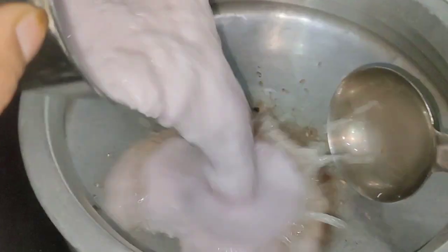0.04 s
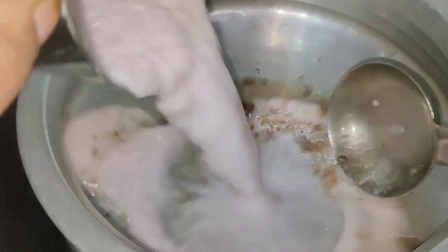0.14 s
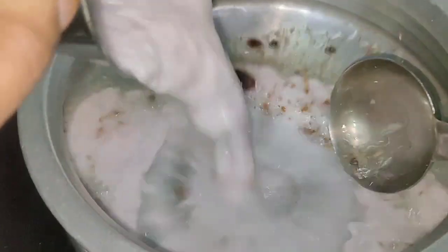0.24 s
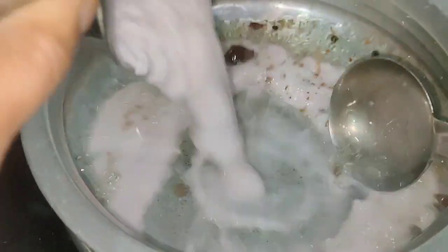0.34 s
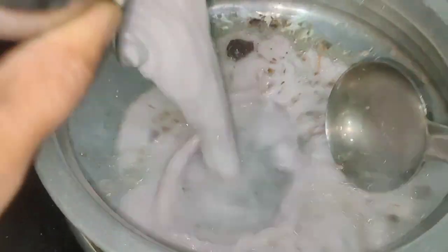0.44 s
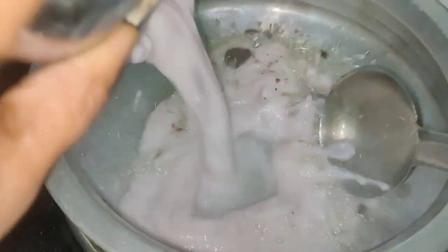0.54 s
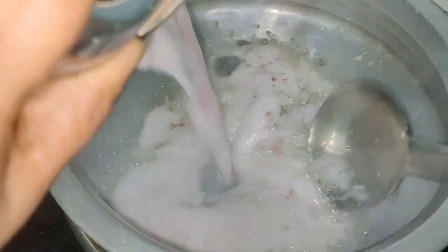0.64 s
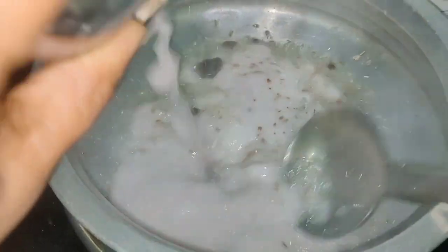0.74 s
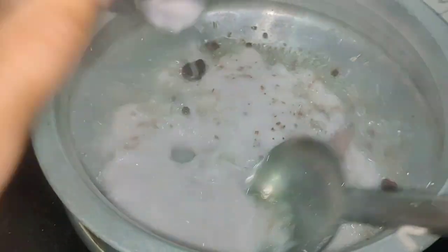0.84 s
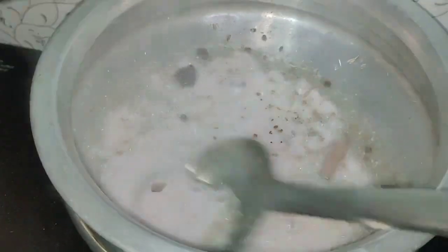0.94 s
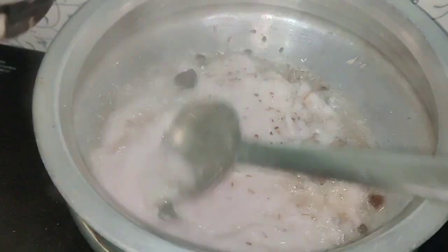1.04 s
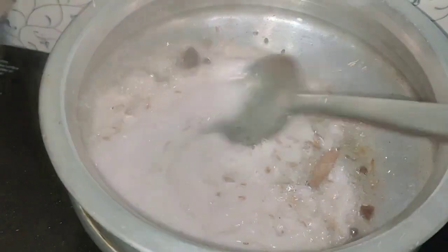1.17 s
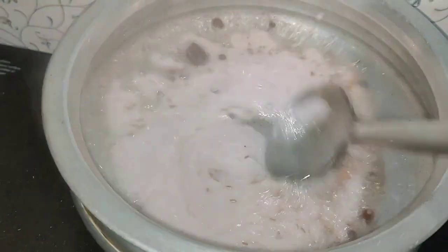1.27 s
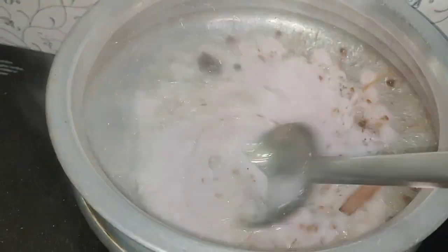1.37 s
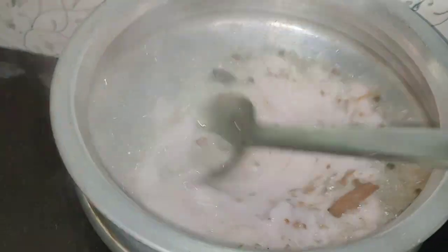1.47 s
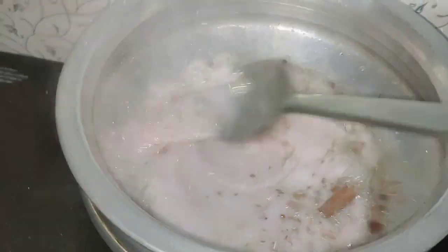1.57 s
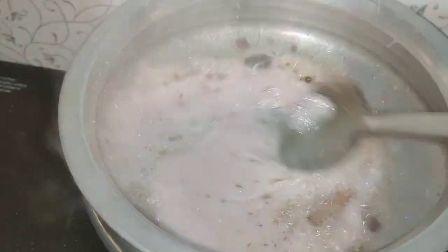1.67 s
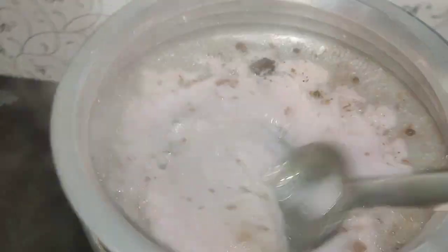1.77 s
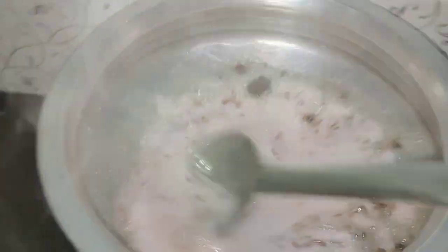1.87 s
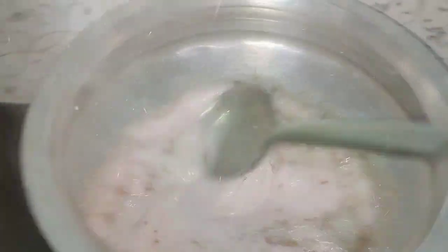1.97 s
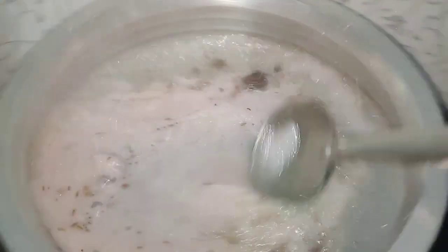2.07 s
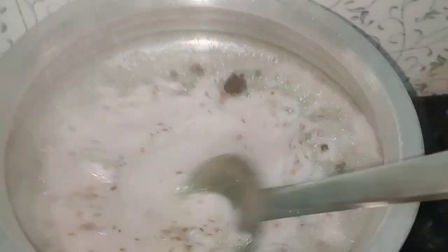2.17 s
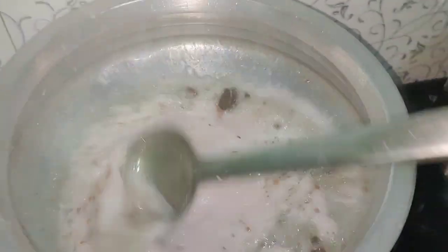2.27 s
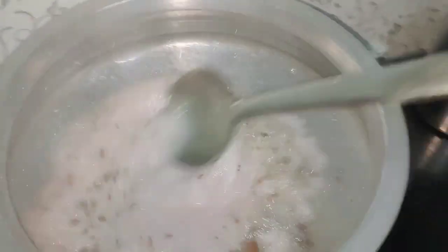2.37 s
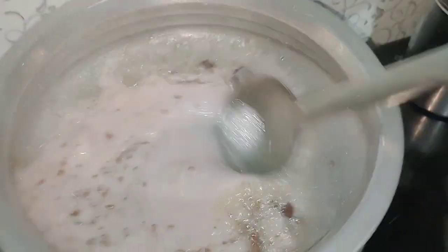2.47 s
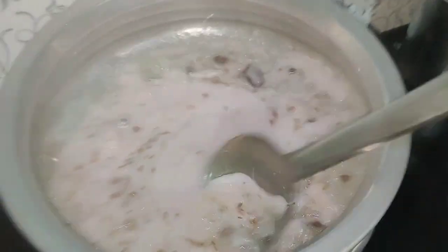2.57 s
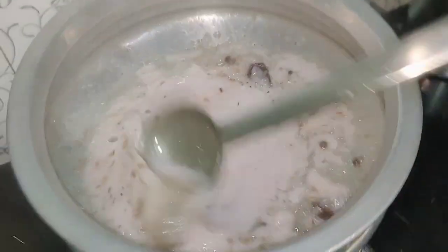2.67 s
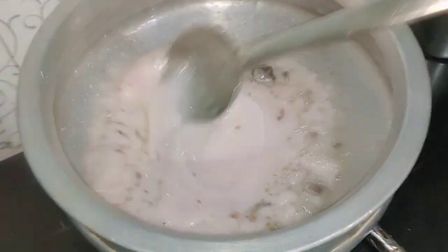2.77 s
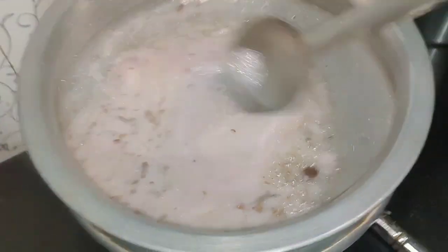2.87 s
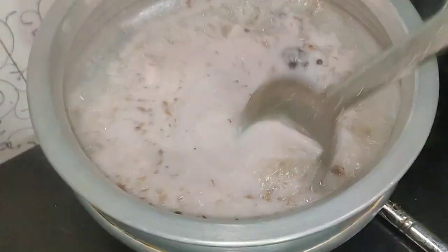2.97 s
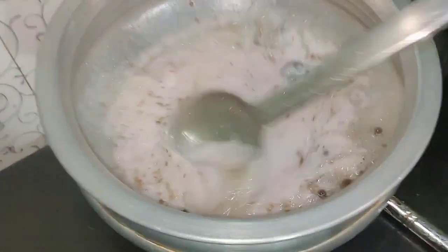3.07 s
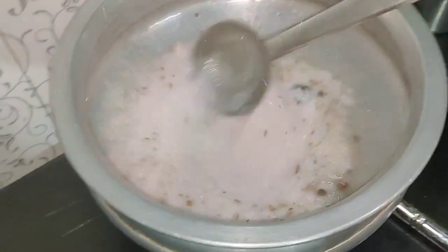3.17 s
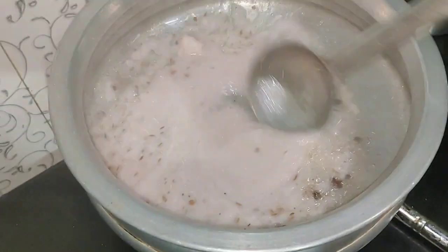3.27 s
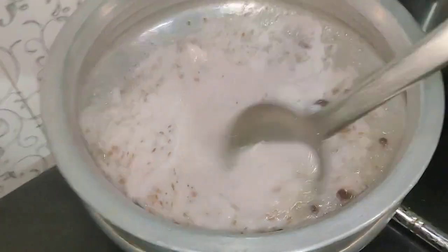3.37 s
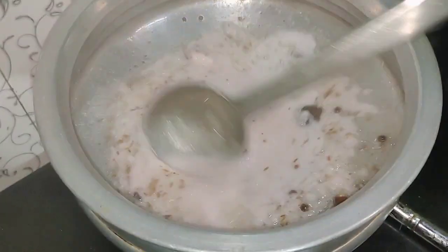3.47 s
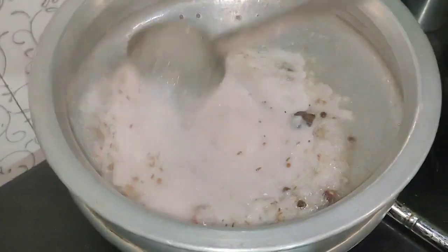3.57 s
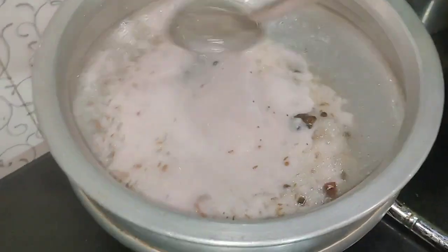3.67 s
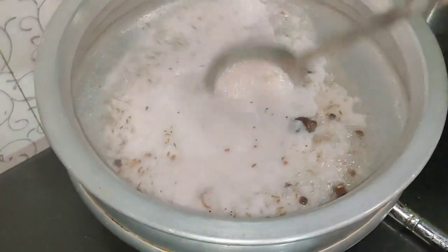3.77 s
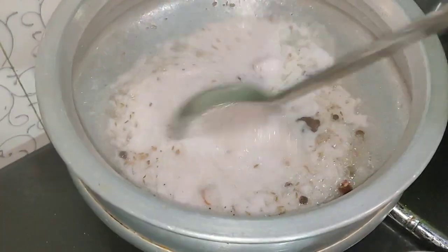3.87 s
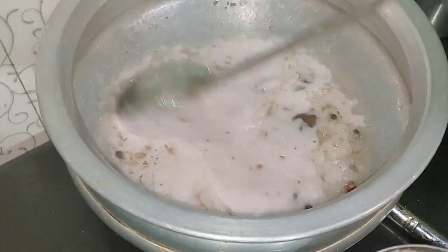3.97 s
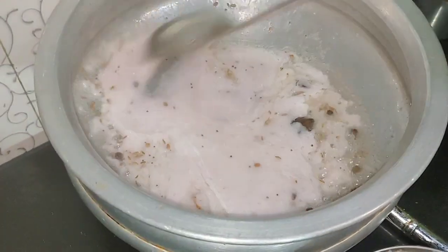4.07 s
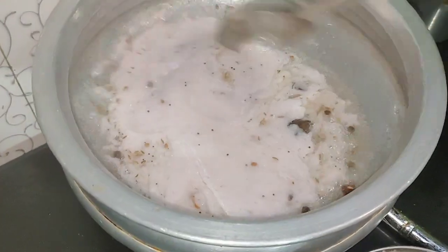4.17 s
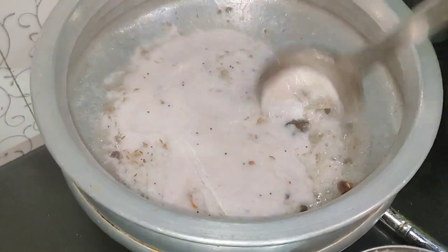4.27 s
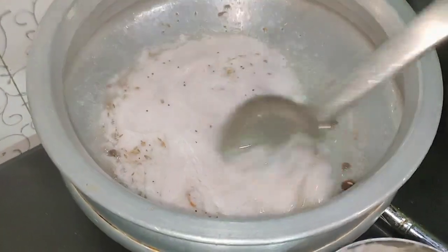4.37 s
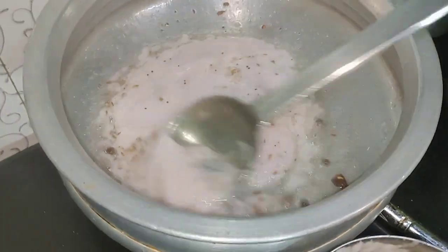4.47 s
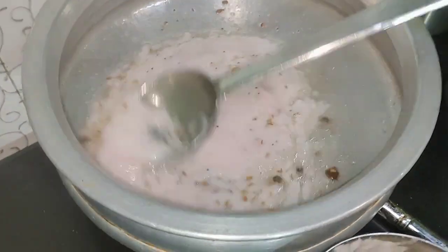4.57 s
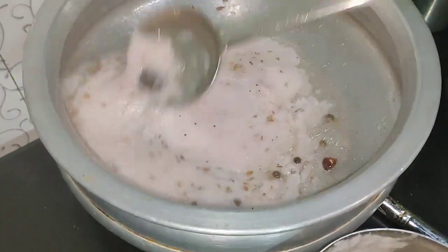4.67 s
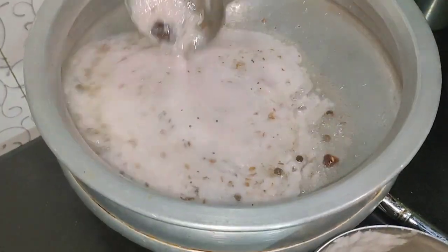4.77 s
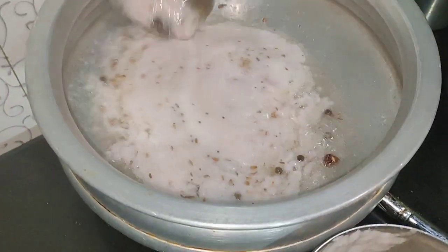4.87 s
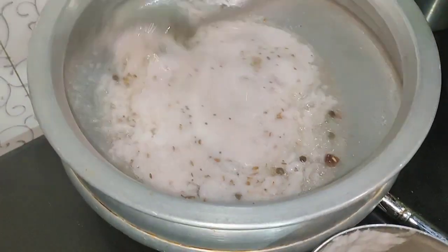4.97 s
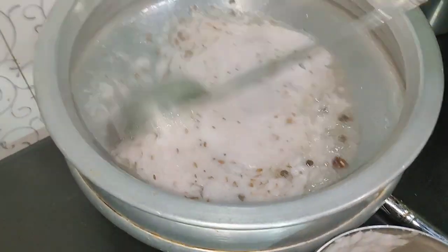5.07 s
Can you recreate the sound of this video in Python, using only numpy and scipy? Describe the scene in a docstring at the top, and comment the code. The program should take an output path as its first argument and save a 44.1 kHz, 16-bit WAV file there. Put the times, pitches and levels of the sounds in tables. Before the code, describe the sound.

Heard up close at a kitchen stove, wet onion paste lands in hot oil with a low plop just after a light metallic tick. A dense, fizzing crackle rises at once, dotted with sharp spits and small wet smacks of steam. The sizzle surges with each ladle stroke, then gradually quietens as the ladle knocks softly in the metal pot. A low gas burner rumble runs underneath throughout.

```python
"""A gas flame rumbles under a wide metal pot of faintly sizzling oil. Metal ticks once on the pot.
Wet onion paste slides in with a plop and a gurgle, and its water flashes to steam: thousands of tiny
bubbles burst and ring in the pot. Drops spit, steam smacks through the paste, and the sizzle swells and
dips with the strokes of a ladle. Late on, the ladle bumps dully and the sizzle fades as the oil cools."""
import sys
import numpy as np
from scipy import signal
from scipy.fft import rfft, irfft, next_fast_len
from scipy.io import wavfile

SR = 44100
rng = np.random.default_rng(int(sys.argv[2]) if len(sys.argv) > 2 else 0)


def put_to_file(sound):
    """Save the sound as 16-bit audio at rate SR, in the file named by the first command-line argument."""
    columns = np.atleast_2d(sound).T  # one column per channel
    safe = np.clip(columns, -1, 1)
    whole_steps = np.round(safe * 32767)
    wavfile.write(sys.argv[1], SR, whole_steps.astype(np.int16))


N = 225995
TIME = np.arange(N) / SR

# how hard the paste fries as it touches, lands, is spread, then cools the oil: (time [s], level [dB])
FRYING_CURVE = [(0.28, -36.5), (0.317, -32), (0.325, -27.5), (0.395, -23.5), (0.425, -19.8), (0.53, -19),
                (0.58, -18.5), (0.685, -18.5), (0.76, -21), (1.46, -20), (1.54, -17.5), (2.2, -19),
                (3.45, -22.5), (4.65, -28), (4.8, -29.5), (5.12, -29)]
FULL_DB = -20  # the point on that curve that counts as full frying
# pitch range and EQ of the small, medium and large bubbles: (frequency [Hz], gain [dB])
FIZZ_EQ = [(2500, -27.5), (4000, -15.5), (4800, -10.5), (5500, -3.5), (6100, -0.5), (7000, 0), (7450, -1.5),
           (8000, -5.5)]
CRACKLE_EQ = [(900, -14.5), (1500, -11.5), (2000, -11), (2400, -9), (3000, -4.5), (3800, -2), (4600, -1.5),
              (6000, -3.5)]
BUBBLING_EQ = [(200, -10.5), (400, -5), (570, -4), (700, 2), (850, -10.5), (1100, 1), (1300, -3),
               (1600, -4), (2300, 0)]
# how each size follows the frying: (at full frying [dB], slope [dB/dB], oil alone [dB], flutter [dB])
FIZZ_DYNAMICS = (-20.5, 1.0, -51.5, 0.68)
CRACKLE_DYNAMICS = (-32.5, 1.13, -55, 0.63)
BUBBLING_DYNAMICS = (-43.5, 1.25, -57.5, -1.2)
# ladle strokes turn wet paste onto hot metal or smother it:
# (middle [s], length [s], crackle lift [dB], bubbling lift [dB])
LADLE_STROKES = [(1.308, 0.19, 3, 1), (1.6, 0.15, -0.5, -2), (2.032, 0.32, 1, 0), (2.477, 0.32, 2.9, 0),
                 (2.87, 0.088, 2.6, 1.5), (3.0, 0.098, -0.5, -2), (4.12, 0.26, -1.1, -1.5),
                 (4.34, 0.12, 4.5, -1), (4.51, 0.13, 1, 4), (4.63, 0.19, 4.2, 1)]
# air resonances of the open pot: (frequency [Hz], width [Hz], lift [dB])
POT_MODES = [(561, 11, 10), (651, 26, 6.5), (675, 30, 5.5), (1118, 120, 6), (1283, 120, 5),
             (1677, 120, 4.5), (2310, 79, 5), (2720, 120, 4), (3840, 340, 2)]
# spits of hot oil: (time [s], level [dB], decay [s], pan left [dB])
OIL_SPITS = [(0.2797, -34.5, 0.0081, -7), (0.562, -20.5, 0.018, -5.5), (0.978, -11.5, 0.0031, 0),
             (1.0338, -11, 0.0036, -2), (1.0431, -12, 0.006, 11.5), (2.1183, -7.5, 0.001, -4),
             (2.96, -13.5, 0.00077, -9.5)]
# steam breaking through the paste: (time [s], level [dB], centre [Hz], width [octaves])
STEAM_SMACKS = [(0.3198, -24, 3830, 0.53), (0.711, -20, 3500, 0.39), (1.2019, -21.5, 2010, 0.25),
                (1.633, -22, 3740, 0.18), (1.6695, -25.5, 2280, 0.14), (2.744, -28, 2820, 0.3),
                (2.8447, -27.5, 2930, 0.22)]
# one dry tick of metal on the pot: (centre [Hz], level [dB], width [octaves], decay [s], pan left [dB])
TICK_BANDS = [(1770, -31.5, 0.21, 0.01, 0.5), (2615, -31.5, 0.16, 0.012, 5), (3500, -35, 0.15, 0.012, 5.5),
              (5630, -24.5, 0.27, 0.0089, -0.5)]
# the paste meets the bottom of the pot: (time [s], level [dB], centre [Hz])
PASTE_PLOPS = [(0.398, -30, 118)]
# gurgle of the falling paste: (frequency [Hz], gain [dB])
GURGLE_EQ = [(40, -25), (120, -2.5), (300, -4.5), (450, -1), (600, -2.5), (900, -15), (1150, -8.5),
             (2000, -40)]
# the ladle bumping through the paste: (time [s], level [dB], centre [Hz], decay [s])
LADLE_BUMPS = [(3.742, -38.5, 450, 0.012), (4.030, -40.5, 850, 0.012), (4.036, -34, 263, 0.027),
               (4.698, -36.5, 250, 0.04)]
# tone of the gas flame: (frequency [Hz], gain [dB])
FLAME_EQ = [(15, -20.5), (45, -19), (65, -22), (100, -12), (170, -18.5), (270, -18.5), (410, -24),
            (520, -19.5), (690, -19.5), (880, -31), (2000, -36)]
# strength of its rumble: (time [s], level [dB])
FLAME_LEVEL = [(0, -37), (0.5, -35.8), (3.1, -37), (3.6, -35.5), (4.35, -35), (4.85, -37.5)]
# how alike it is left and right: (frequency [Hz], likeness [0-1])
FLAME_LIKENESS = [(100, 1), (240, 0.94), (400, 0.6), (700, 1), (1500, 0.5)]
# air resonances of the stove corner: (frequency [Hz], width [Hz], lift [dB])
CORNER_MODES = [(93.9, 7.7, 18), (142, 20, 7.5), (191, 11, 8), (238.5, 12, 8), (293.5, 9.4, 5)]
# colour of the two microphone ports: (frequency [Hz], gain [dB])
LEFT_EQ = [(600, -1), (1600, 0.7), (2800, 3.5), (5000, 1.5), (5700, 3), (6150, 2.5), (6800, -3.5),
           (7500, -2.5), (8000, -1.5)]
RIGHT_EQ = [(600, -1.5), (1600, -1.5), (2800, -1), (5000, -3.5), (5900, -3), (6500, 1), (7000, 4),
            (7500, 4), (8000, 0.5)]


def sizzle():
    """Water flashes to steam in three sizes of bubble; the pour and the ladle lift the larger two."""
    crackle_db, bubbling_db = 0.5 * pour(), 2.5 * pour()
    for middle_s, length_s, crackle_lift, bubbling_lift in LADLE_STROKES:
        arch = np.exp(-(2 * (TIME - middle_s) / length_s) ** 2)
        crackle_db += crackle_lift * arch
        bubbling_db += bubbling_lift * arch
    surge = wander(top_hz=35)  # steam escapes unevenly
    fizz = bubbles(FIZZ_EQ, ring_s=0.00013, spread_db=2.0, scatter_db=15.0, lag_s=0.00045,
                   echo_db=0.5, echo_s=0.005, count=48000, samples=52)
    crackle = bubbles(CRACKLE_EQ, ring_s=0.00031, spread_db=2.0, scatter_db=2.5, lag_s=0.0005,
                      echo_db=-0.5, echo_s=0.005, count=16000, samples=110)
    bubbling = bubbles(BUBBLING_EQ, ring_s=0.0008, spread_db=0.0, scatter_db=-3.0, lag_s=0.0003,
                       echo_db=-10, echo_s=0.0097, count=7000, samples=260)
    crackle, bubbling = (kitchen(cloud, wet_db=-6.5, t60=0.13) for cloud in (crackle, bubbling))
    return (fry(fizz, FIZZ_EQ, FIZZ_DYNAMICS, 0, surge, band_hz=(5000, 8000))
            + fry(crackle, CRACKLE_EQ, CRACKLE_DYNAMICS, crackle_db, surge, band_hz=(1500, 4200))
            + fry(bubbling, BUBBLING_EQ, BUBBLING_DYNAMICS, bubbling_db, surge, band_hz=(1000, 1400)))


def bubbles(eq, ring_s, spread_db, scatter_db, lag_s, echo_db, echo_s, count, samples):
    """Bursting bubbles: each a short ping with its own moment, pitch, strength and place in the pot."""
    when, pitch, strength, side, place = rng.random((count, 5)).T
    hz = eq[0][0] + pitch * (eq[-1][0] - eq[0][0])
    t = np.arange(samples) / SR
    level = amp(spread_db * np.minimum(-np.log(1 - strength), 5))  # many faint, few strong
    pings = level[:, None] * t / ring_s * np.exp(-t / ring_s) * np.sin(2 * np.pi * hz[:, None] * t)

    def arrive(delay_s, gain):
        """All the pings, each by a path of its own length and gain."""
        start = np.round(when * N + delay_s * SR).astype(int)
        slots = start[:, None] + np.arange(samples)
        return np.bincount(slots.ravel(), (gain[:, None] * pings).ravel(), N)[:N]

    pan_db = scatter_db * (side - .5)
    ports = np.array([arrive(lag_s * place, amp(pan_db)), arrive(0, amp(-pan_db))])  # left is farther
    for port in ports:
        for _ in range(2):  # two bounces off the pot wall
            port += arrive(echo_s * rng.exponential(1, count), amp(echo_db) * rng.choice([-1, 1], count))
    return ports


def fry(pings, eq, dynamics, lift_db, surge, band_hz):
    """Bubbles ring in the pot; their level in band_hz is the quiet oil plus the paste once it touches."""
    full_db, slope, oil_db, flutter_db = dynamics
    frying_db = np.interp(TIME, *np.transpose(FRYING_CURVE))
    paste = amp(full_db + slope * (frying_db - FULL_DB) + lift_db) * (TIME > FRYING_CURVE[0][0])
    envelope = np.hypot(paste, amp(oil_db)) * amp(flutter_db * surge)
    cloud = shaped(pings, lambda hz: amp(curve_at(eq, hz)) * resonance(POT_MODES, hz))
    in_band = shaped(cloud.mean(0), lambda hz: (hz > band_hz[0]) & (hz < band_hz[1]))
    return envelope * cloud / np.std(in_band)


def spits_and_smacks():
    """Hot oil spits in bright snaps; steam breaks through the paste in lower, wet smacks."""
    spits = sum(puff(s, db, hz=6600, octaves=0.25, decay_s=decay_s, pan_db=pan_db)
                for s, db, decay_s, pan_db in OIL_SPITS)
    smacks = sum(puff(s, db, hz, octaves, decay_s=0.012, pan_db=-2.5)
                 for s, db, hz, octaves in STEAM_SMACKS)
    return kitchen(spits + smacks, wet_db=-19.5, t60=0.2)


def metal_tick(at_s=0.1885):
    """Metal touches the pot just ahead of the pour and rings briefly in four bands."""
    tick = sum(puff(at_s, db, hz, octaves, decay_s, pan_db)
               for hz, db, octaves, decay_s, pan_db in TICK_BANDS)
    return kitchen(tick, wet_db=-9.5, t60=0.42)


def falling_paste():
    """The paste lands with a low plop and gurgles while it runs."""
    plop = sum(puff(s, db, hz, octaves=1.0, decay_s=0.032, pan_db=-1, rise_s=0.004, mono=0.78)
               for s, db, hz in PASTE_PLOPS)
    gurgle = unit_rms(shaped(rng.standard_normal(N), lambda hz: amp(curve_at(GURGLE_EQ, hz))))
    return plop + amp(-42) * pour() * gurgle


def pour(start_s=0.325, rise_s=0.038, hold_s=0.42, fall_s=0.17):
    """Flow of paste into the pot, 0-1: it lands, runs on and tails off."""
    return np.interp(TIME, start_s + np.cumsum([0, rise_s, hold_s, fall_s]), [0, 1, 1, 0])


def ladle_bumps():
    """The ladle pushes through the paste in dull, soft-edged knocks."""
    return sum(puff(s, db, hz, octaves=0.3, decay_s=decay_s, pan_db=0, rise_s=0.004, mono=0.78)
               for s, db, hz, decay_s in LADLE_BUMPS)


def flame():
    """Rumble of the burner, booming in the corner around the stove."""
    left, other = rng.standard_normal((2, N))
    likeness = lambda hz: np.clip(curve_at(FLAME_LIKENESS, hz), 0, 1)
    right = shaped(left, likeness) + shaped(other, lambda hz: np.sqrt(1 - likeness(hz) ** 2))
    tone = lambda hz: amp(curve_at(FLAME_EQ, hz)) * resonance(CORNER_MODES, hz)
    level_db = np.interp(TIME, *np.transpose(FLAME_LEVEL))
    return amp(level_db) * unit_rms(shaped(np.array([left, right]), tone))


def kitchen(x, wet_db, t60):
    """Adds the kitchen's dense reflections, different left and right, down 60 dB after t60 seconds."""
    t = np.arange(SR // 4) / SR
    tail = rng.standard_normal((2, len(t))) * amp(-60 * t / t60)
    tail /= np.linalg.norm(tail, axis=1, keepdims=True)
    return x + amp(wet_db) * signal.oaconvolve(x, tail, axes=1)[:, :N]


def puff(at_s, db, hz, octaves, decay_s, pan_db, rise_s=0.0002, mono=0.15):
    """A sudden burst of noise around one pitch, dying away."""
    t = np.arange(SR // 4) / SR
    noise = rng.standard_normal((3, len(t)))
    stereo = mono * noise[0] + (1 - mono) * noise[1:]
    band = unit_rms(shaped(stereo, lambda f: np.exp(-.5 * (np.log2((f + 1) / hz) / octaves) ** 2)))
    envelope = (1 - np.exp(-t / rise_s)) * np.exp(-t / decay_s)
    burst = amp(db + np.array([[pan_db], [-pan_db]]) / 2) * band * envelope / envelope.max()
    return np.pad(burst, ((0, 0), (round(at_s * SR), N)))[:, :N]


def resonance(modes, hz):
    """Gain of a body of air with the given resonances."""
    return 1 + sum((amp(db) - 1) / (1 + 2j * (hz - centre) / width) for centre, width, db in modes)


def wander(top_hz):
    """Random modulation of rms 1, rolling off above top_hz."""
    return unit_rms(shaped(rng.standard_normal(N), lambda hz: hz / (hz + 2) / (1 + (hz / top_hz) ** 2)))


def shaped(x, gain):
    """Filters x by gain(Hz)."""
    size = next_fast_len(x.shape[-1] + 4096)
    return irfft(rfft(x, size) * gain(np.fft.rfftfreq(size, 1 / SR)), size)[..., :x.shape[-1]]


def curve_at(points, hz):
    """Joins (Hz, value) points by straight lines on a log axis."""
    f, value = np.transpose(points)
    return np.interp(np.log(hz + 1), np.log(f + 1), value)


def amp(db):
    """Decibels to gain."""
    return 10 ** (np.asarray(db) / 20)


def unit_rms(x):
    """Scales to rms 1."""
    return x / np.sqrt(np.mean(x ** 2) + 1e-20)


def scene():
    """The sizzle up front, sharp and dull accents ringing in the pot, and the flame as a bed."""
    frying = sizzle()
    accents = metal_tick() + spits_and_smacks() + falling_paste() + ladle_bumps()
    return frying + shaped(accents, lambda hz: resonance(POT_MODES, hz)) + flame()


def record(dry):
    """Each microphone port colours the treble; a soft limiter rounds the spits; a low-pass cuts the top."""
    ceiling, cutoff_hz = 0.93, 7720
    ports = np.array([shaped(x, lambda hz: amp(curve_at(eq, hz)))
                      for x, eq in zip(dry, (LEFT_EQ, RIGHT_EQ))])
    envelope = abs(signal.hilbert(ports))
    limited = ports / (1 + (envelope / ceiling) ** 8) ** (1 / 8)
    low_pass = signal.firwin(201, cutoff_hz, window=("kaiser", 9), fs=SR)
    return signal.oaconvolve(limited, low_pass[None], "same", axes=1)


dry = scene()
out = record(dry)
put_to_file(out)
```